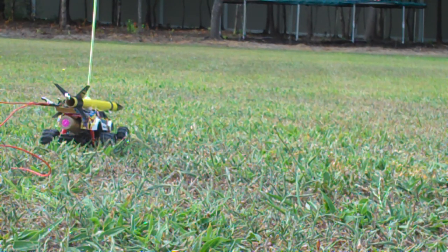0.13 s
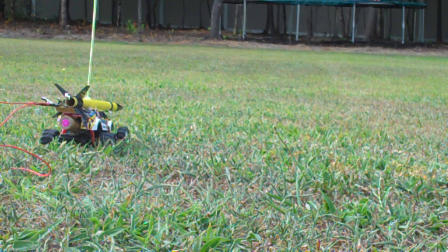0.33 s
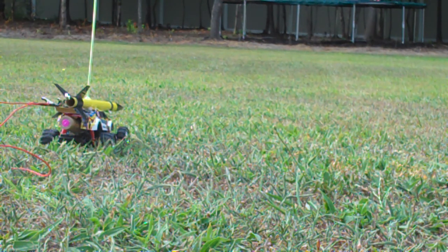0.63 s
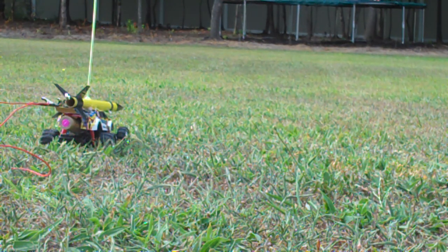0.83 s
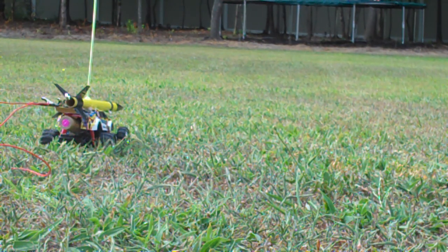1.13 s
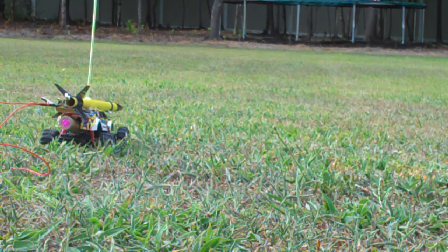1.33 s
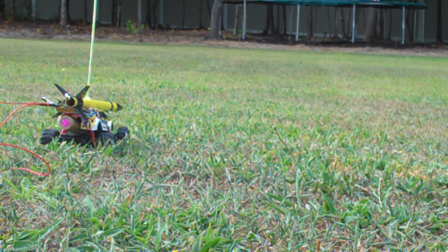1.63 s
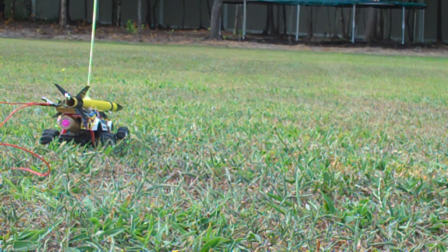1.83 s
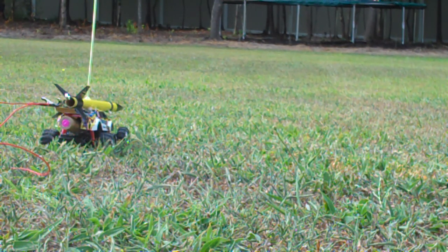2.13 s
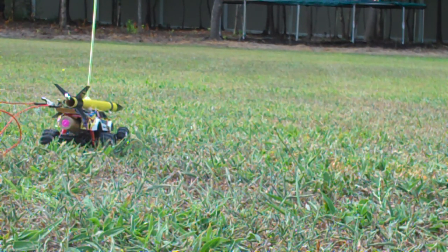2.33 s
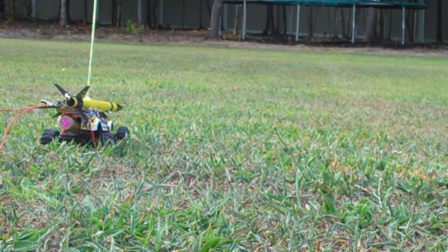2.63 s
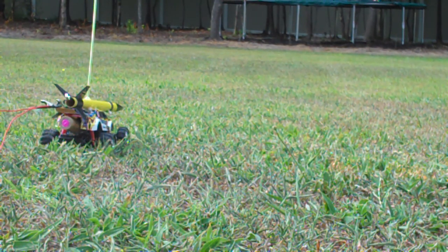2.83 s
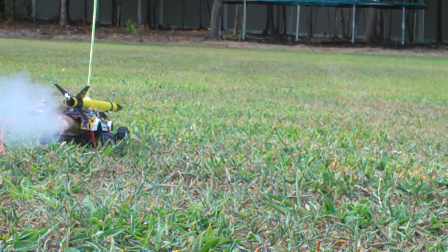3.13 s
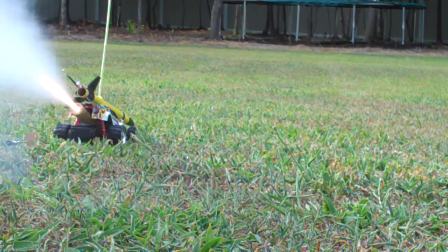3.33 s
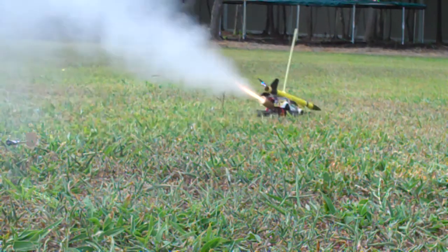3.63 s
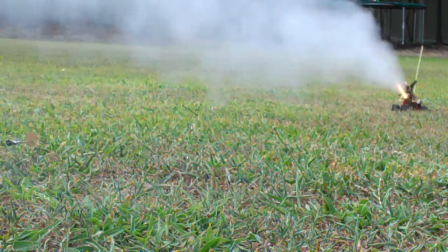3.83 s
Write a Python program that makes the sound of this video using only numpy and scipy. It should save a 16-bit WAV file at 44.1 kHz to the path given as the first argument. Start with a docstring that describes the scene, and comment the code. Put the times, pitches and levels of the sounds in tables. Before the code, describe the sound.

A small rocket motor ignites and roars away after quiet birdsong on a lawn.

```python
"""A quiet lawn: a steady motor hum, outdoor hiss, distant birds and a breeze rumbling on the microphones.
About three seconds in, a small solid-fuel rocket on a toy car lights a few metres away. The igniter
fizzes and pops, the fuel chuffs, and the turbulent jet roars up, overloads the microphones
and races away."""
import sys
import numpy as np
from scipy import signal
from scipy.fft import rfft, irfft
from scipy.io import wavfile
from scipy.ndimage import uniform_filter1d

SR = 44100
rng = np.random.default_rng(int(sys.argv[2]) if len(sys.argv) > 2 else 0)


def int16_out(signal):
    """Quantize to a 16-bit WAV file."""
    q = np.round(np.clip(np.atleast_2d(signal).T, -1, 1) * 32767)
    wavfile.write(sys.argv[1], SR, q.astype(np.int16))


N = 176400
T = np.arange(N) / SR
SIDES = np.array([[.5], [-.5]])  # splits a difference between left and right
RIGHT_HOT_DB = 2.5  # the right channel's gain over the left


def undb(db):
    """Gain of a dB value."""
    return 10 ** (np.asarray(db) / 20)


def curve(table, at, column=1):
    """A table's column, interpolated along its first."""
    return np.interp(at, np.array(table)[:, 0], np.array(table)[:, column])


def colour(table, hz):
    """A spectrum read on a log-frequency axis."""
    return np.interp(np.log(hz), np.log(np.array(table)[:, 0]), np.array(table)[:, 1])


def step(v, at, width):
    """Soft step from 0 to 1."""
    return .5 + .5 * np.tanh((v - at) / width)


def above(hz, edge_hz, width):
    """Soft crossover from 0 to 1 in log frequency."""
    return step(np.log(hz), np.log(edge_hz), width)


def drift(rate_hz, n):
    """Smooth random modulation: held values, slewed twice."""
    hold = int(SR / rate_hz)
    held = np.repeat(rng.standard_normal(n // hold + 1), hold)
    return 0.95 * uniform_filter1d(uniform_filter1d(held, hold), hold)[:n]


def level(x, db):
    """Scale to an rms level."""
    return x * undb(db) / np.sqrt(np.mean(x ** 2))


def add(out, start_s, sound):
    """Mix a short sound in."""
    i = int(start_s * SR)
    out[..., i:i + sound.shape[-1]] += sound


def filtered(x, hz, order, kind="band"):
    """Butterworth filter, band-pass by default."""
    return signal.sosfilt(signal.butter(order, hz, kind, fs=SR, output="sos"), x)


def burst(hz, width, n):
    """Noise from hz / width to hz * width, rms 1."""
    edges = [hz / width, min(hz * width, .45 * SR)]
    return level(filtered(rng.standard_normal(2000), edges, order=2)[-n:], 0)


def bands(n, spectrum):
    """Overlapping third octaves of a spectrum: yields the centre and three unrelated complex noises."""
    bin_hz = np.maximum(np.arange(n // 2) * SR / n, 1)
    gain = undb(colour(spectrum, bin_hz))
    for hz in 25 * 2 ** (np.arange(28) / 3):
        if hz > spectrum[-1][0]:
            return
        offset = 3 * np.log2(bin_hz / hz)
        inside = np.flatnonzero(abs(offset) < 1)
        real, imag = rng.standard_normal((2, 3, len(inside)))
        bins = np.zeros((3, n), complex)
        bins[:, inside] = (real + 1j * imag) * np.cos(np.pi / 2 * offset[inside]) * gain[inside]
        yield hz, np.fft.ifft(bins)


def stereo(noise, likeness, phase=0., pan_db=0.):
    """Left and right from one shared and two separate noises; likeness 0 is fully wide."""
    likeness = np.clip(likeness, 0, 1)
    shared = np.sqrt(likeness) * noise[0] * np.exp(1j * phase * SIDES)
    separate = np.sqrt(1 - likeness) * noise[1:]
    return (shared + separate).real * undb(pan_db * SIDES)


# Tone of the outdoor bed (frequency [Hz], relative density [dB])
AIR_SPECTRUM = [(25, -26), (80, 0), (170, -4.5), (350, -8), (550, -16), (750, -22), (1290, -23.5),
                (3000, -23), (5850, -26), (9180, -32.5), (14000, -54)]


def air():
    """Distant outdoor wash, centred in the bass and wide in the treble, levelled by its hiss."""
    wash = sum(undb(1.6 * drift(6, N)) * stereo(noise, likeness=1 - above(hz, 1030, 0.7))
               for hz, noise in bands(N, AIR_SPECTRUM))
    hiss = filtered(wash, 700, order=4, kind="high")
    return wash * undb(-55) / np.sqrt(np.mean(hiss ** 2))


# Faint ringing in the bed (centre [Hz], bandwidth [Hz], level [dB])
RING_BANDS = [(1300, 19, -70.5), (2035, 27, -72.5), (2817, 32, -70)]


def rings():
    """Narrow bands of noise, half alike left and right."""
    noise = rng.standard_normal((3, N))
    half_shared = noise[0] + noise[1:]
    return sum(level(filtered(half_shared, [hz - width / 2, hz + width / 2], order=1), db)
               for hz, width, db in RING_BANDS)


# Partials of the motor (harmonic [number], level [dB])
MOTOR_HARMONICS = [(4, -58), (5, -64.5), (6, -51.5), (7, -63), (8, -49.5), (9, -68.5), (10, -66)]
MOTOR_HZ = 58.98


def motor_hum():
    """A small motor's steady harmonics, barely wavering in pitch and level."""
    phase = 2 * np.pi * np.cumsum(MOTOR_HZ * (1 + 0.00062 * drift(1.8, N))) / SR
    out = np.zeros(N)
    for harmonic, db in MOTOR_HARMONICS:
        gain = np.sqrt(2) * undb(db + 0.47 * drift(4.23, N))
        out += gain * np.sin(harmonic * phase + 2 * np.pi * rng.random())
    return out


# Chirps (time [s], length [s], start pitch [Hz], middle pitch [Hz], end pitch [Hz], level [dB])
BIRD_CHIRPS = [(.175, .025, 3600, 3100, 2600, -57), (.305, .1, 4950, 4950, 4900, -60),
               (.422, .055, 4750, 4300, 3750, -50), (.5, .027, 3600, 3200, 2700, -57),
               (.61, .034, 5320, 5250, 4150, -43), (.626, .045, 3400, 3050, 2700, -56),
               (.634, .025, 10300, 8000, 6850, -57), (.668, .045, 6950, 7200, 7500, -60),
               (.72, .054, 4850, 4250, 3050, -49), (.738, .009, 5300, 5900, 6600, -55),
               (.748, .09, 7000, 7050, 7000, -57), (.83, .033, 4100, 5800, 5850, -52),
               (.872, .012, 3000, 4600, 7000, -58), (.92, .025, 6700, 7150, 6800, -55),
               (.947, .026, 6400, 5350, 4700, -40), (1.03, .022, 2650, 3100, 3400, -50),
               (1.338, .025, 3600, 3200, 2750, -54), (1.47, .03, 4950, 4850, 4900, -54),
               (1.592, .05, 4800, 4350, 4000, -52), (2.15, .03, 3900, 3700, 3600, -59),
               (2.205, .028, 3550, 3050, 2500, -55), (2.279, .045, 3550, 3050, 2320, -52),
               (2.283, .018, 4400, 4900, 3950, -47), (2.335, .03, 4900, 4800, 4950, -48),
               (2.388, .032, 5250, 5050, 4900, -49), (2.432, .035, 4900, 5100, 5050, -55),
               (2.47, .076, 4900, 4200, 3550, -44.5), (2.537, .059, 4600, 4200, 3550, -45)]
# Raspy calls (time [s], length [s], centre [Hz], level [dB])
BIRD_RASPS = [(.878, .042, 5400, -45), (.785, .04, 4400, -55), (.945, .04, 4150, -56),
              (1.008, .022, 2800, -56), (1.062, .045, 4000, -54)]
TREES_T60_S, TREES_GAP_S, TREES_DB = .55, .012, -5


def birds():
    """Wobbly whistles gliding through three pitches, and a few rasps, echoed by the trees."""
    calls, wobble = np.zeros(N), 1 + .012 * drift(200, N)
    for start, length, first, middle, last, db in BIRD_CHIRPS:
        u = np.arange(int(length * SR)) / (length * SR)
        glide_hz = first * (1 - u) * (1 - 2 * u) + 4 * middle * u * (1 - u) + last * u * (2 * u - 1)
        hz = glide_hz * wobble[int(start * SR):][:len(u)]
        fade_db = 6 * (.5 - u) * (last < first)  # falling notes fade as they fall
        envelope = undb(db + fade_db) * np.sqrt(2 * np.sin(np.pi * u))
        add(calls, start, envelope * np.sin(2 * np.pi * np.cumsum(hz) / SR))
    calls *= undb(2.3 * drift(150, N))  # roughens the whistles
    for start, length, hz, db in BIRD_RASPS:
        arch = np.sin(np.linspace(0, np.pi, int(length * SR)))
        add(calls, start, undb(db) * arch * burst(hz, width=1.15, n=len(arch)))
    t = T[:SR // 2]
    tail = rng.standard_normal((2, len(t))) * undb(-60 * t / TREES_T60_S) * step(t, TREES_GAP_S, 0.021)
    tail *= undb(TREES_DB) / np.sqrt(np.sum(tail ** 2) / 2)
    echo = signal.fftconvolve(calls[None], tail, axes=1)[:, :N]
    return calls * undb(.3 * SIDES) + echo


# Swell of the breeze (time [s], level [dB])
BREEZE_SWELL = [(0, -72), (.8, -55), (1.1, -47), (1.5, -37.5), (1.7, -41.5), (2.1, -48.5), (2.4, -45),
                (2.8, -45.5), (3.3, -59)]
# Tone of its rumble (frequency [Hz], relative density [dB])
BREEZE_SPECTRUM = [(25, -6.5), (100, 1), (200, -0.5), (330, -5.5), (450, -23), (700, -29)]
# Soft thumps of wind (centre time [s], peak [dB], pitch [Hz], length [cycles])
WIND_BUFFETS = [(0.584, -39, 100, 2.5), (0.916, -35.5, 115, 3), (1.071, -31, 116, 3.7),
                (1.13, -36, 131, 1.8), (1.265, -39, 50, 2.8), (1.295, -30.5, 98, 1.9),
                (1.415, -40, 65, 2.1), (1.424, -30.5, 202, 6.5), (1.525, -31, 200, 6),
                (1.811, -33, 200, 9.6), (2.405, -32.5, 123, 7.9), (2.621, -34, 103, 1.2),
                (3.085, -27, 107, 2.3)]


def breeze():
    """Wind on the microphones: a centred, gusting rumble with single short buffets."""
    gust = drift(11.94, N)
    rumble = sum(undb(2.5 * (gust + drift(14, N))) * stereo(noise, likeness=1)
                 for hz, noise in bands(N, BREEZE_SPECTRUM))
    out = level(rumble, 0) * undb(curve(BREEZE_SWELL, T))
    for centre, db, hz, cycles in WIND_BUFFETS:
        t = T[:int(cycles / hz * SR)]
        half = t[-1] / 2
        envelope = undb(db) * np.sin(np.pi * t / t[-1]) ** 2
        add(out, centre - half, envelope * np.cos(2 * np.pi * hz * (t - half)))
    return out


# Bright ticks of the igniter (time [s], level [dB])
IGNITER_SPARKS = [(3.052, -36), (3.0715, -40), (3.084, -39), (3.1406, -17), (3.1447, -18), (3.1486, -17),
                  (3.155, -19), (3.282, -10)]
# Duller pops as the fuel catches (time [s], level [dB], centre [Hz])
FUEL_CHUFFS = [(3.148, -19, 1380), (3.208, -22, 960), (3.281, -14, 2500), (3.33, -8.5, 1290),
               (3.338, -13, 1940), (3.349, -4.5, 1320), (3.358, -1, 1670)]


def ignition():
    """Sparks and chuffs: puffs of noise that die at once."""
    out, t = np.zeros(N), T[:900]

    def puff(hz, width, t60_s):
        attack = np.clip(t / 0.0009, 0, 1)
        return attack * undb(-60 * t / t60_s) * burst(hz, width, len(t))

    for start, db in IGNITER_SPARKS:
        add(out, start, undb(db) * puff(hz=6000, width=1.35, t60_s=.0064))
    for start, db, hz in FUEL_CHUFFS:
        add(out, start, undb(db) * puff(hz, width=2.1, t60_s=.011))
    return out


BLAST_S, BLAST_RISE_S, BLAST_FALL_S = 3.36, 0.023, 0.18


def low_wobble():
    """A wide, deep wobble: a low rumble, unrelated left and right, swells in as the roar peaks and then fades."""
    rumble = filtered(rng.standard_normal((2, N)), [25, 132], order=2)
    fall = np.exp(-(np.maximum(T - BLAST_S, 0) / BLAST_FALL_S) ** 2)
    return level(rumble, -25) * step(T, BLAST_S, BLAST_RISE_S) * fall


# Fader ride of the thrust (time [s], relative level [dB], low-mid EQ [dB])
JET_THRUST = [(3.04, -58, 7), (3.09, -47, -30), (3.128, -38, -33), (3.138, -30.5, -29), (3.149, -26, -9.5),
              (3.162, -26.5, -24), (3.21, -27, -23), (3.25, -30, -7.5), (3.283, -23, 0), (3.298, -23, -5),
              (3.325, -14.5, -2), (3.352, -15.5, 7), (3.372, -12, -6.5), (3.41, -11.5, -5.5),
              (3.456, -8.5, -8), (3.526, -12, -8.5), (3.568, -16.5, -9), (3.61, -22.5, -4),
              (3.65, -15, -10.5), (3.69, -17.5, -9), (3.806, -22, -3), (3.854, -23, -6),
              (3.898, -26.5, -10), (3.966, -24.5, -6), (4.0, -32, -16)]
# Slower moves (time [s], bass EQ [dB], top EQ [dB], stereo likeness [0-1], leftward pan [dB])
JET_MOVES = [(3.1, -27, -19, 0.8, -2), (3.15, -8, -0.5, 0.6, 1), (3.18, -21, -42, 1, -2),
             (3.26, -9, -14, 1, -1.5), (3.35, -19, -20, 0.98, -2.5), (3.4, -7, -22, 0.25, -1),
             (3.53, -11.5, -27, 0.18, 0.5), (3.6, -13, -16, 0.42, -2), (3.8, -11, -16, 0.46, -3),
             (4.0, -12.5, -18.5, 0.6, -3)]
# Tone of the roar before EQ (frequency [Hz], relative density [dB])
JET_SPECTRUM = [(24, -58), (40, -31), (170, -10.5), (264, -8.5), (411, -6), (464, -6), (740, -3.5),
                (837, -3), (7240, -2), (9710, -2.5), (14000, -13)]
# Phase between the microphone ports before the car crosses (frequency [Hz], left lead [rad])
MIC_PHASE = [(300, .05), (2000, 0.18), (4000, 0.6), (6000, 0.76), (8000, 1.24), (9600, 2.9), (12000, 3.1)]
# Balance between the ports (frequency [Hz], leftward pan [dB])
MIC_BALANCE = [(2000, -0.5), (4000, 1.5), (6000, -0.5), (8000, -3.5), (9600, -6.5), (11000, 3.5)]
BASS_FLAT_DB, MID_FLAT_DB, TOP_FLAT_DB = -16, -7, -12  # EQ values that leave the tone unchanged
BASS_EDGE_HZ, MID_EDGE_HZ, TOP_EDGE_HZ = 766, 2860, 10130
SURGE_DB, FLICKER_DB, SHOCK_SKEW = 0.42, 1.5, 0.065
CROSS_START_S, CROSS_LENGTH_S = 3.547, 0.36


def jet():
    """Turbulent exhaust: bands surge together and flicker alone; steep shocks make the wave lopsided."""
    start = int(JET_THRUST[0][0] * SR)
    t, n = T[start:], N - start
    mid_db = curve(JET_THRUST, t, column=2)
    bass_db, top_db, body_likeness, body_pan_db = (curve(JET_MOVES, t, k) for k in range(1, 5))
    crossed = np.clip((t - CROSS_START_S) / CROSS_LENGTH_S, 0, 1)
    phase_scale = 1 - 0.82 * crossed  # the port phase shrinks as the car moves across
    roar, power, surge = 0, 0, drift(41, n)
    for hz, noise in bands(n, JET_SPECTRUM):
        bass = 1 - above(hz, BASS_EDGE_HZ, 0.83)
        mid = 1 - bass - above(hz, MID_EDGE_HZ, 0.72)
        treble = above(hz, 5130, 0.37)
        eq_db = bass * (bass_db - BASS_FLAT_DB) + mid * (mid_db - MID_FLAT_DB)
        turbulence_db = SURGE_DB * surge + FLICKER_DB * drift(59.8, n)
        likeness = (1 - treble) * body_likeness + treble * 0.9  # the treble stays narrow
        phase = phase_scale * colour(MIC_PHASE, hz)
        pan_db = colour(MIC_BALANCE, hz) + (1 - treble) * (body_pan_db + RIGHT_HOT_DB)
        roar += undb(eq_db + turbulence_db) * stereo(noise, likeness, phase, pan_db)
        power += np.mean(noise.real ** 2)
    roar /= np.sqrt(power)
    roar -= SHOCK_SKEW * filtered(roar ** 2, [150, 8000], order=4)
    bin_hz = np.arange(n // 2 + 1) * SR / n
    top = irfft(rfft(roar) * step(bin_hz, TOP_EDGE_HZ, 200), n)
    roar += (undb(top_db - TOP_FLAT_DB) - 1) * top
    attack = np.clip((t - t[0]) / 0.018, 0, 1)
    envelope = attack * undb(curve(JET_THRUST, t) + 2)
    return np.pad(roar * envelope, ((0, 0), (start, 0)))


def scene():
    """The rocket over the lawn's ambience, which reaches the right microphone two samples later."""
    ambience = birds() + motor_hum() + rings() + air() + breeze()
    ambience[1] = np.roll(ambience[1], 2)
    return jet() + low_wobble() + ignition() + ambience


OVERLOAD_S, OVERLOAD_LENGTH_S, OVERLOAD_DB, RECOVER_S = 3.361, .067, -15.5, .15
CEILING, LOWPASS_HZ = 0.98, 14180


def record(dry):
    """The blast shoves the baseline, which creeps back; the right runs hot; peaks clip; the top is cut."""
    shove = step(T, OVERLOAD_S, .012) - step(T, OVERLOAD_S + OVERLOAD_LENGTH_S, .012)
    leak = np.exp(-1 / (RECOVER_S * SR))
    baseline = undb(OVERLOAD_DB) * signal.lfilter([1, -1], [1, -leak], shove)
    clipped = np.clip((dry + baseline) * undb(-RIGHT_HOT_DB * SIDES), -CEILING, CEILING)
    return signal.sosfilt(signal.ellip(8, .2, 70, LOWPASS_HZ, fs=SR, output="sos"), clipped)


dry = scene()
out = record(dry)
int16_out(out)
```